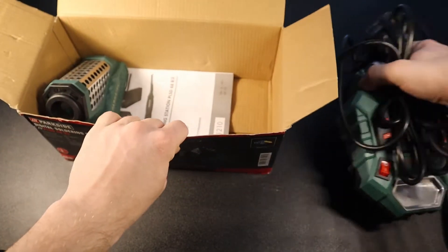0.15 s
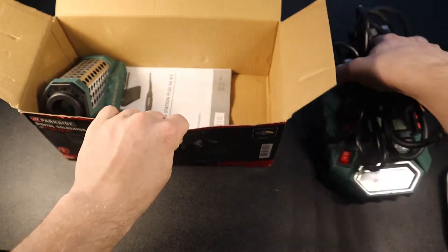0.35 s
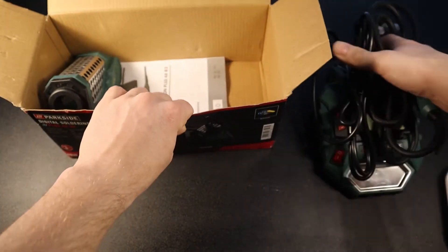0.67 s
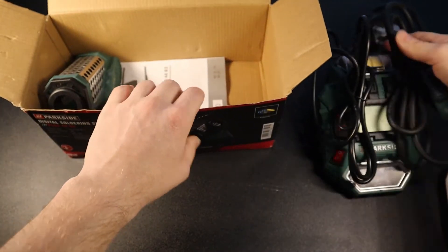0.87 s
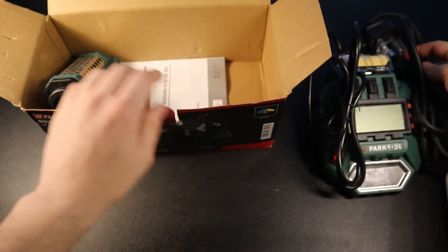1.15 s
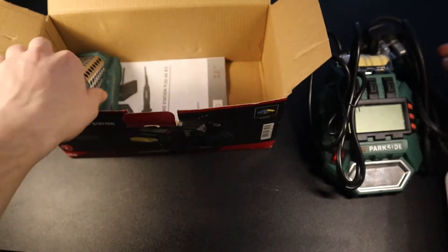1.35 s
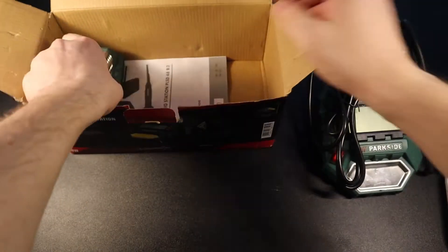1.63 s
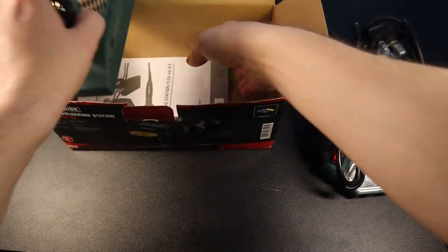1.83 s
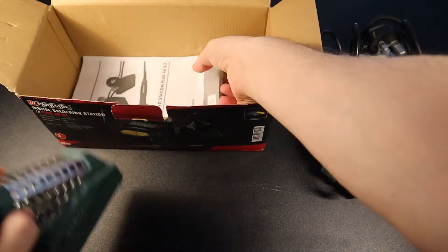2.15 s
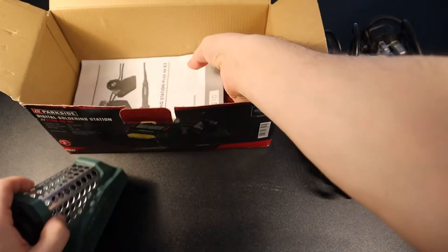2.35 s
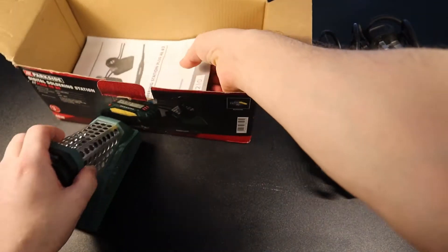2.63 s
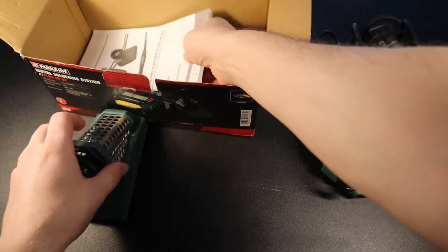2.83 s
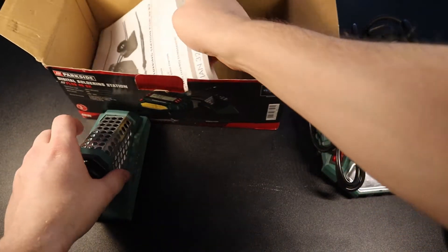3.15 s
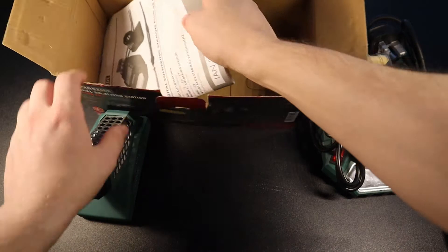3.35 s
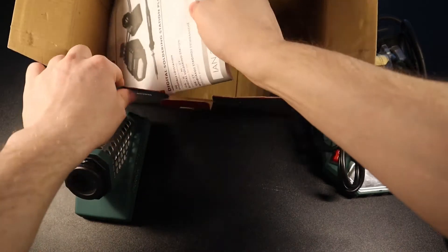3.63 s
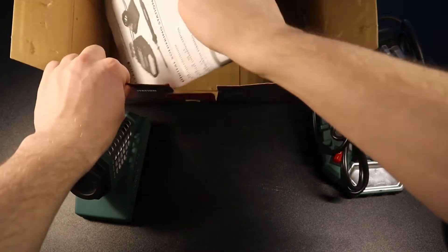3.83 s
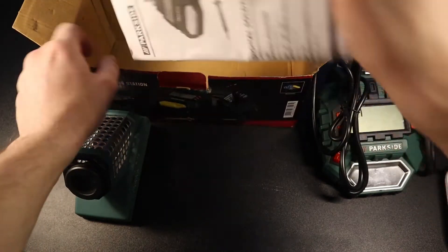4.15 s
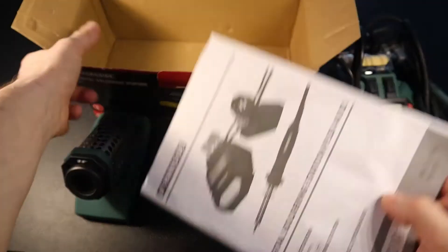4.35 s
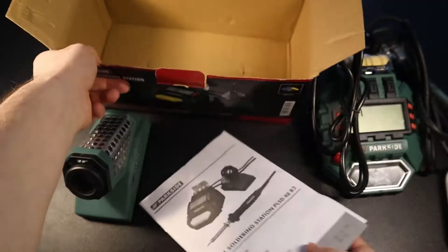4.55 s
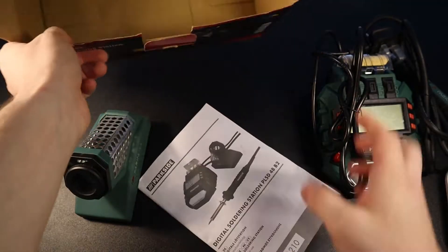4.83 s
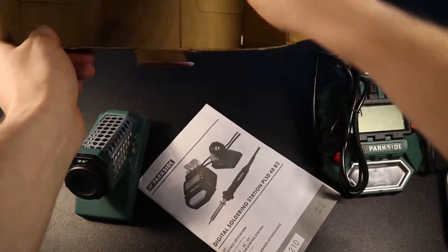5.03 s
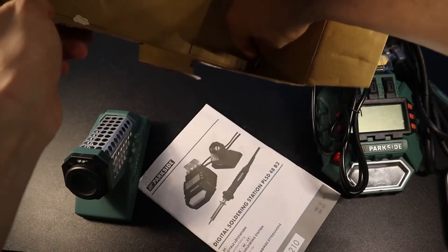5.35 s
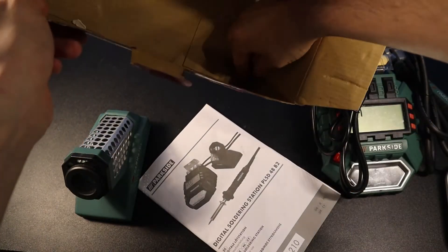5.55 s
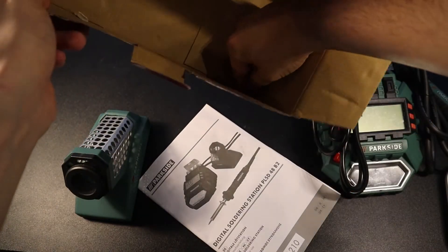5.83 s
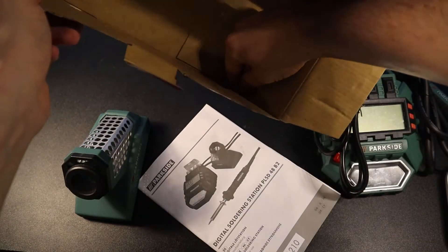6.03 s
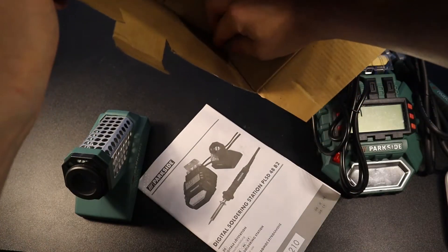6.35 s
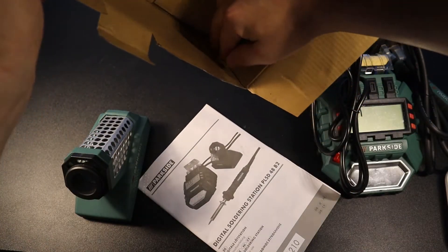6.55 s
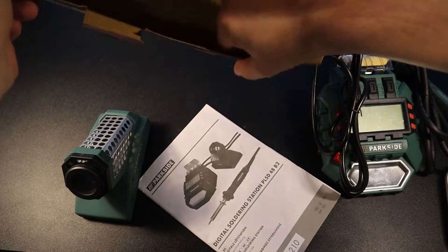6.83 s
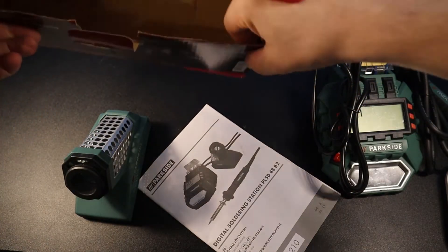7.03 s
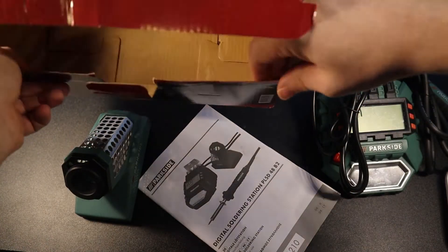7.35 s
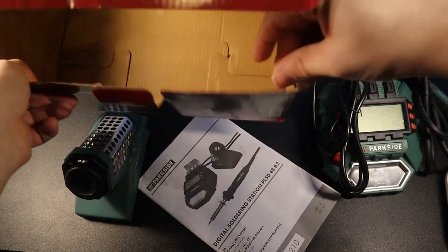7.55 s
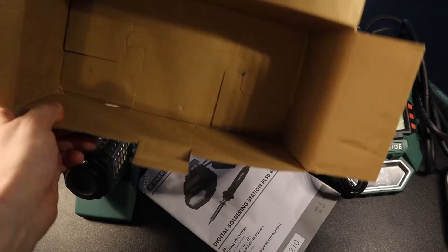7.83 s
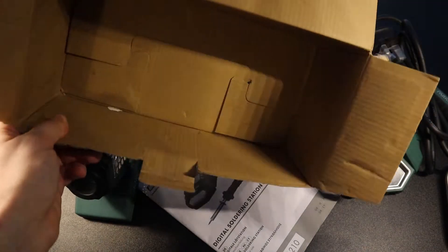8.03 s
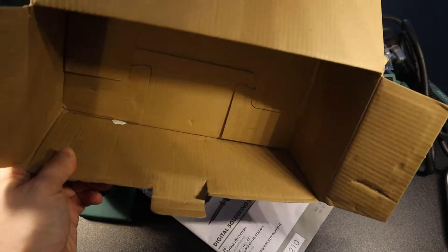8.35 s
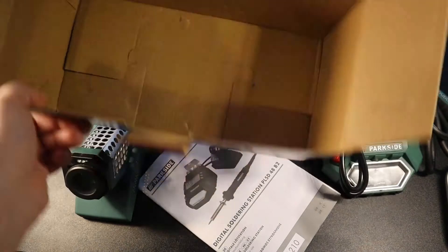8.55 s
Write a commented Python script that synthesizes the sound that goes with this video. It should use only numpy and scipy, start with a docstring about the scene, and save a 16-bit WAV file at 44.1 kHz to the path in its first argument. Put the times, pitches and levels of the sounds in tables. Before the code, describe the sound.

A close, dry handling scene in a small quiet room with very faint rumble and hiss. From 0 to 2 s, plastic knocks and clacks on a table, strongest at the start and near 0.7, 1.3 and 1.85 s, with brief cardboard scuffs and small snaps. Around 2.3 s light ticks lead into a firmer knock at 2.6 s; until about 4.2 s a paper booklet slides and rustles along the cardboard in short strokes, with faint low groans, ending in the loudest clack at 4.07 s. Quieter taps and paper flicks follow to 5.2 s. At 5.35 s a hollow box thump begins rubbing and scraping of the empty box, with snaps and tiny squeaks around 6.7 s. Softer, separate scuffs continue from 7 s. A dull bump lands at 7.8 s, a short rasp snaps at 7.92 s, then faint brushes fade to 8.7 s.

```python
"""Plastic knocks on a table, a booklet slides out of a cardboard box, then hands rub and bump the empty box,
and a flap snaps free with a short rasp, all close by in a small quiet room.
Knocks and bumps are fading rings started by a blow; rubbing is noise and tiny catches shaped like box or paper.
Small snaps are short noise bursts, groans are swelling narrow noise, and the rasp is a run of quickening slips."""
import sys
import numpy as np
from scipy import signal
from scipy.fft import rfft, irfft, next_fast_len
from scipy.io import wavfile
from scipy.ndimage import uniform_filter1d, map_coordinates

SR = 44100
rng = np.random.default_rng(int(sys.argv[2]) if len(sys.argv) > 2 else 0)


def digitize_waveform(pressure):
    """Quantize a signal to 16-bit integers and store it at the path in sys.argv[1].

    Rows of a 2-D input are taken as channels; values are limited to [-1, 1].
    """
    field = np.atleast_2d(pressure).T
    bounded = np.clip(field, -1, 1)
    quanta = np.round(bounded * 32767).astype(np.int16)
    wavfile.write(sys.argv[1], SR, quanta)


N = 382788  # length in samples

# how firmly the hands rub while the box is unloaded: t/s, handling level before trims/dB
UNLOADING = [(0, -53.5), (0.2, -80.5), (0.34, -78), (0.42, -67), (0.6, -61), (0.72, -70.5), (1.49, -73),
             (1.56, -55.5), (1.88, -64.5), (2.0, -73.5), (2.42, -64.5), (2.68, -60.5), (4.19, -59.5),
             (4.26, -74), (4.5, -74.5), (4.72, -61.5), (5.12, -90)]
# the same while the empty box is turned: t/s, handling level before trims/dB
TURNING = [(5.28, -89), (5.38, -56.5), (5.66, -61.5), (6.2, -69.5), (6.3, -56.5), (6.78, -60),
           (6.86, -75.5), (7.32, -69), (7.5, -87), (7.66, -70), (8.06, -74.5), (8.24, -85.5), (8.68, -91)]


def amp(db):
    """Turn decibels into a gain."""
    return 10 ** (np.asarray(db) / 20)


def unit(x):
    """Scale x to an average (rms) level of 1."""
    return x / np.sqrt(np.mean(x ** 2) + 1e-20)


def burst(x):
    """Scale x to rms 1 over its first 20 ms."""
    return x / np.sqrt(np.mean(x[:SR // 50] ** 2) + 1e-20)


def along(points, hz):
    """Read a curve of (f/Hz, value) points on a logarithmic frequency axis."""
    f, value = np.transpose(points)
    return np.interp(np.log(hz + 1), np.log(f + 1), value)


def curve(rows):
    """Join (t/s, value) points with straight lines, giving one value per sample."""
    times, values = np.transpose(rows)
    return np.interp(np.arange(N) / SR, times, values)


def wobble(rate):
    """A smooth random curve through this many random points a second."""
    points = rng.standard_normal(int(N * rate / SR) + 4)
    return map_coordinates(points, [np.arange(N) * rate / SR])


def filtered(x, response):
    """Multiply the spectrum of x by a function of frequency."""
    size = next_fast_len(N + 8192)
    hz = np.fft.rfftfreq(size, 1 / SR)
    return irfft(rfft(x, size) * response(hz), size)[:N]


def coloured(x, spectrum):
    """Shape x with a spectrum, at rms 1."""
    return unit(filtered(x, lambda hz: amp(along(spectrum, hz))))


def band(x, lo_hz, hi_hz, order=2):
    """Keep the sound between two frequencies."""
    edges = [lo_hz, min(hi_hz, SR / 2 - 1)]
    return signal.sosfilt(signal.butter(order, edges, 'band', fs=SR, output='sos'), x)


def add(track, s, x):
    """Mix x into the track at time s."""
    start = max(round(s * SR), 0)
    track[start:start + len(x)] += x[:N - start]


def in_room(x, wet_db):
    """Add a fresh random room tail in which each frequency dies away at its own speed."""
    # time for the tail to drop by 60 dB: f/Hz, t60/s
    room_decay = [(100, 0.15), (300, 0.23), (800, 0.14), (2500, 0.2), (12000, 0.14)]
    hz, t, z = signal.stft(rng.standard_normal(SR // 2), SR, nperseg=256)
    decay = amp(-60 * t / along(room_decay, hz)[:, None])
    tail = signal.istft(z * decay, SR, nperseg=256)[1]
    tail *= 1 - np.exp(-np.arange(len(tail)) / SR / 0.0073)  # the tail builds up over some 7 ms
    wet = signal.fftconvolve(x, tail / np.linalg.norm(tail))[:len(x)]
    return x + amp(wet_db) * wet


def struck(t, hz, t60):
    """One ringing tone that drops by 60 dB in t60 seconds."""
    return np.sin(2 * np.pi * hz * t) * amp(-60 * t / t60)


def crack(t, t60, scatter_db):
    """A single click and its dense, quickly dying scatter between nearby walls."""
    scatter = rng.standard_normal(len(t)) * amp(-60 * t / t60)
    return (t == 0) + amp(scatter_db) * scatter / np.linalg.norm(scatter)


def catches(rate, spread_db):
    """Fibres catch at random moments, on average rate a second, with uneven strength, at rms 1."""
    moments = rng.random(N) < rate / SR
    signs = rng.choice([-1, 1], N)
    strength = amp(spread_db * np.minimum(rng.standard_normal(N), 2))
    return unit(moments * signs * strength)


def room_air():
    """The room's faint rumble and hiss: steady noise shaped by a spectrum."""
    # strength of the background at each frequency: f/Hz, relative level/dB
    air_spectrum = [(12, -23), (20, 1), (27, -14.5), (53, -11), (172, -37), (308, -21.5), (397, -28),
                    (655, -34), (1650, -45), (2120, -40.5), (5470, -45), (8790, -50.5), (15800, -52)]
    return amp(-74) * coloured(rng.standard_normal(N), air_spectrum)


def hollow_ring(t, pitch_hz, modes):
    """The hollow box and table ring in many tones, stronger on average near the struck panel's pitch."""
    ring = np.zeros(len(t))
    for hz, level_db, t60 in modes:
        octaves_away = abs(np.log2(hz / pitch_hz))
        drive = rng.choice([-1, 1]) * amp(rng.normal(0, 3.8) - 2 * octaves_away)
        ring += drive * amp(level_db) * struck(t, hz, t60)
    return ring


def knocks():
    """Each blow bends one panel, rings the hollow body and clacks as hard as the contact is."""
    # blows on table and box; the levels are set before the trims below:
    # t/s, level/dB, panel pitch f/Hz, then the parts: thump/dB, clack/dB, tick/dB
    blows = [(0.0, -34.5, 645, -19, -6, -17), (0.089, -51, 390, -16, -6.5, -11.5),
             (0.367, -39, 420, 0, -9.5, -22), (0.539, -37.5, 506, -15, -5, -26),
             (0.739, -28.5, 727, -15.5, -7.5, -26.5), (0.775, -57.5, 590, 3, 9, -10),
             (0.86, -57, 520, -18, -17, -25), (0.95, -46, 300, -15, -12, -16.5),
             (1.116, -51, 423, -28, -7, -17), (1.303, -26.5, 620, -26, 2, -20.5),
             (1.357, -35, 686, -10, -6, -23.5), (1.484, -50, 607, -5, -19, -17),
             (1.5256, -40, 965, -11, -4, -8), (1.849, -31.5, 625, -17, -7, -20.5),
             (1.878, -41.5, 516, -12, -4, -14.5), (1.946, -51.5, 570, -25, -5.5, -5),
             (2.05, -49, 510, -12, -9.5, -11.5), (2.372, -51, 342, 1, -12, -26),
             (2.511, -36.5, 252, -10, -16, -19.5), (2.591, -30.5, 620, -15, -2, -18.5),
             (2.637, -48, 579, 1, -16, -14), (2.811, -46.5, 805, -10, -2.5, -6),
             (3.082, -45, 463, 8.5, -5, -0.5), (3.164, -42, 385, -24, -11, -19),
             (3.532, -37, 580, -28, -13.5, -42), (3.681, -42.5, 527, 0, -7, -22),
             (3.817, -43, 560, -32, -4.5, -29), (3.957, -44.5, 506, -2, 3, -10.5),
             (4.015, -43.5, 520, -22, 2.5, -6.5), (4.067, -22.5, 700, -20, -8, -31.5),
             (4.143, -29, 514, -15, -23, -30), (4.443, -60.5, 585, -3, -19, -18),
             (4.619, -49.5, 620, -2.5, -1, -7.5), (4.715, -50, 383, -10, -11, -9),
             (4.975, -49.5, 1020, -6.5, 0.5, -16.5), (5.339, -27, 614, -7, -7, -15.5),
             (5.431, -42.5, 791, -24, -2, -8), (5.477, -45.5, 667, -11, 2.5, -5),
             (5.54, -46, 614, -14, -4, -7.5), (5.673, -50, 590, -23, -4, -18),
             (5.928, -55, 615, -23, -8, -16), (6.256, -50.5, 340, 1.5, -22, -13),
             (6.309, -45.5, 400, -7.5, -13, -15), (7.711, -42.5, 610, -1.5, -12, -6),
             (7.822, -31.5, 336, -5.5, -23, -33.5), (7.987, -46, 305, -4, -1.5, -4.5),
             (8.113, -53, 570, -13, -9, -17.5)]
    # tones of the hollow box and table: f/Hz, level/dB, t60/s
    hollow_modes = [(70.9, -13.5, 0.099), (119, -5, 0.15), (165, 0, 0.095), (221.4, -4, 0.12),
                    (290, -0.5, 0.038), (352, -2, 0.086), (465.3, 4, 0.13), (580, 8, 0.086),
                    (672, 7.5, 0.046), (920.5, 5, 0.065), (1114, -1.5, 0.058), (1440, -10, 0.074),
                    (1572, -5, 0.045), (1957, -16.5, .06)]
    contact_s = 0.00029  # build-up time of a blow whose clack setting is 0 dB
    softening = 0.5  # dB longer build-up for each dB less clack
    out, t = np.zeros(N), np.arange(SR // 2) / SR
    for s, db, pitch_hz, thump_db, clack_db, tick_db in blows:
        ring = hollow_ring(t, pitch_hz, hollow_modes)
        thump = burst(band(ring, 43, 350, order=3))

        low_scatter = burst(band(crack(t, 0.069, 4.8), 430, 930))
        rattle = burst(burst(band(ring, 380, 1300)) + low_scatter)
        panel = burst(burst(struck(t, pitch_hz, 0.012)) + amp(-6) * rattle)

        high_scatter = burst(band(crack(t, 0.1, 3.3), 780, 3600))
        shell = burst(burst(band(ring, 1200, 2500)) + high_scatter)
        hard_contact = burst(burst(struck(t, 1300, 0.0045)) + amp(-3) * shell)
        # thick plastic and card radiate little above this band
        clack = burst(band(hard_contact, 750, 2300, order=3))
        tick = burst(band(crack(t, 0.04, 0), 1500, 4500, order=1))

        blow = amp(thump_db - 5.5) * thump
        blow += amp(-5.5) * band(panel, 220, 1400)
        blow += amp(clack_db - 8) * clack
        blow += amp(tick_db - 5) * band(tick, 1800, 17000)
        contact = contact_s * amp(-softening * clack_db)  # dull blows are soft ones
        blow *= 1 - np.exp(-t / max(contact, 1 / SR))  # a soft contact builds up slowly
        add(out, s + 0.0005, in_room(amp(db) * blow, wet_db=-10))  # starts 0.5 ms after the listed time
    return out


def stroke(t, length, swell_db):
    """Gain of one slide, t from its start: it sets in, arches over while swelling or fading, and stops."""
    attack_s, release_t60, arch_db = 0.014, 0.082, 3.5
    course = np.clip(t / length, 0, 1) - 0.5
    # a stroke is fastest, so loudest, in mid-course
    held = amp(swell_db * course - arch_db * (2 * course) ** 2)
    release = amp(-60 * np.maximum(t - length, 0) / release_t60)
    return np.clip(t / attack_s, 0, 1) * held * release


def sliding_levels(handling, steady_hiss_db):
    """Scraping and hiss in dB: the power of the steady rub plus that of the single strokes."""
    # single slides of paper, card and hands; levels before trims:
    # start t/s, length t/s, wall scraping level/dB, hiss level/dB, swell from start to end/dB
    slides = [(0.439, 0.12, -51, -93, 13.5), (0.911, 0.21, -68, -82, -11), (1.14, 0.088, -76, -78.5, 0),
              (1.702, 0.058, -52.5, -69, -8), (2.049, 0.062, -68, -70.5, -8), (2.451, 0.076, -60, -58, -6),
              (2.629, 0.065, -48.5, -60.5, -5), (2.741, 0.078, -58, -55.5, 4.5),
              (2.902, 0.136, -56.5, -59.5, -0.5), (3.034, 0.076, -48, -57.5, 4),
              (3.191, 0.135, -53.5, -57, 8.5), (3.383, 0.064, -55.5, -54.5, -4),
              (3.452, 0.033, -55.5, -76, -7), (3.594, 0.09, -55.5, -69.5, -8),
              (3.817, 0.087, -53.5, -59.5, 4), (3.946, 0.075, -51, -55.5, 3), (4.056, 0.098, -67, -61, -9),
              (4.695, 0.089, -81, -67.5, 9), (4.813, 0.078, -70, -71.5, -1), (5.496, 0.11, -51, -73, -9),
              (5.741, 0.037, -55, -72.5, -2), (5.91, 0.049, -54.5, -62, -2), (6.327, 0.069, -55, -58, 0),
              (6.45, 0.024, -56, -64, -5), (6.514, 0.054, -50.5, -67, -7), (6.616, 0.11, -54, -59.5, 2),
              (6.74, 0.11, -76, -68, 0), (6.88, 0.04, -53, -58.5, 3.5), (6.981, 0.058, -57.5, -67, 1),
              (7.054, 0.053, -58, -64, 2), (7.198, 0.059, -56, -68.5, -7), (7.359, 0.068, -62.5, -68.5, 3),
              (7.532, 0.038, -55, -64.5, -5), (7.687, 0.038, -46.5, -56.5, -3),
              (7.875, 0.062, -57.5, -66, -3), (7.993, 0.032, -66, -69, -5), (8.114, 0.064, -72, -79, -3),
              (8.272, 0.097, -78, -85, 1), (8.6, 0.081, -73.5, -77.5, 4.5)]
    steady = amp(curve(handling))
    scrape_power = steady ** 2
    hiss_power = (amp(steady_hiss_db) * steady) ** 2
    t = np.arange(SR // 2) / SR
    for s, length, wall_db, surface_db, swell_db in slides:
        gain = stroke(t, length, swell_db)
        add(scrape_power, s, (amp(wall_db) * gain) ** 2)
        add(hiss_power, s, (amp(surface_db) * gain) ** 2)
    return 10 * np.log10(scrape_power), 10 * np.log10(hiss_power)


def patchy(x, depth_db, size):
    """The contact point wanders, so that resonances come and go."""
    z = signal.stft(x, nperseg=512)[2]
    across_pitch = uniform_filter1d(rng.standard_normal(z.shape), size, 0)
    field = uniform_filter1d(across_pitch, 7, 1)  # smoothed over time as well
    return unit(signal.istft(z * amp(depth_db * unit(field)), nperseg=512)[1][:N])


def rubbing(handling, steady_hiss_db, scrape_spectrum, hiss_spectrum):
    """Sliding fibres hiss; their catches shake the box walls, which also flex under the pressure."""
    # slow flexing of the walls: f/Hz, relative level/dB
    flex_spectrum = [(25, -12), (60, 0), (130, -4.5), (220, -4), (350, -10), (700, -35.5)]
    scrape_db, hiss_db = sliding_levels(handling, steady_hiss_db)
    grip_db = 1.2 * wobble(70)  # the contact sticks and lets go

    ridges = catches(rate=460, spread_db=3)
    shaking = patchy(ridges + amp(-6) * rng.standard_normal(N), depth_db=4, size=2)
    body = amp(scrape_db - 2.07 + grip_db) * coloured(shaking, scrape_spectrum)

    fibres = catches(rate=7400, spread_db=-0.5)
    fibres += amp(-3) * rng.standard_normal(N) + amp(-12) * ridges
    crackle = 0.5 * catches(rate=110, spread_db=5)  # single fibres break free
    rustle = patchy(fibres, depth_db=5, size=3) + crackle
    surface = amp(hiss_db - 1.8 + grip_db) * coloured(rustle, hiss_spectrum)

    # the flexing grows less than the scraping does
    flex_db = 0.46 * scrape_db - 43 + wobble(12)
    flex = amp(flex_db) * coloured(rng.standard_normal(N), flex_spectrum)

    t = np.arange(N) / SR
    during = (t >= handling[0][0]) * (t < handling[-1][0])
    return in_room((body + surface + flex) * during, wet_db=-10)


def unloading():
    """Rubbing of the loaded box and its booklet, with the spectra of card and paper."""
    # scraping of the loaded box: f/Hz, relative level/dB
    scrape_spectrum = [(120, -29.5), (230, -3), (400, -1), (750, -1.5), (930, -2.5), (1200, -9),
                       (1700, -13), (2400, -24.5), (3500, -20), (7000, -62.5)]
    # hiss of sliding paper: f/Hz, relative level/dB
    hiss_spectrum = [(900, -18.5), (1900, 7.5), (3200, 4.5), (4200, 2), (4900, -2.5), (6300, 3), (9000, -1),
                     (11000, 1), (13000, -8.5), (15800, -10.5)]
    return rubbing(UNLOADING, -13.5, scrape_spectrum, hiss_spectrum)


def crinkles():
    """Creases and small parts tick at random, louder when the handling is firmer."""
    pitch_hz, ticks_per_s, level_db = 3600, 16, -19  # level relative to the handling
    t = np.arange(SR // 8) / SR
    flick = band(crack(t, 0.054, -1.8), pitch_hz * 0.36, pitch_hz * 1.3, order=1)
    handling_db = curve(UNLOADING + TURNING)
    ticks = catches(rate=ticks_per_s, spread_db=5) * amp(handling_db + level_db)
    return signal.fftconvolve(ticks, flick / np.linalg.norm(flick))[:N]


def buckles():
    """A box wall gives way softly under the hands with a dull, low bump."""
    # bumps of the walls: t/s, level/dB, pitch f/Hz
    bumps = [(0.37, -53, 125), (0.425, -57, 117), (0.556, -51.5, 130), (2.435, -56, 165),
             (2.745, -59.5, 156), (3.085, -52, 115), (4.187, -63.5, 128), (4.592, -62.5, 330),
             (5.341, -42.5, 264), (5.343, -47.5, 80.5), (5.585, -62, 111), (6.31, -55, 127),
             (6.473, -64, 73), (7.826, -40.5, 290)]
    out, t = np.zeros(N), np.arange(SR // 3) / SR
    for s, db, pitch_hz in bumps:
        swing = struck(t, pitch_hz, 11 / pitch_hz)  # it dies within a few cycles
        swing *= 1 - np.exp(-t / 0.004)  # soft start
        add(out, s, in_room(amp(db) * burst(swing), wet_db=-11.5))
    return out


def snaps():
    """Paper edges, creases and thin plastic parts flick over with a very short ring."""
    # small dry snaps: t/s, level before the trim below/dB, pitch f/Hz
    flicks = [(0.8848, -64, 3230), (1.353, -50, 2740), (1.5262, -38, 3050), (1.5777, -57, 3040),
              (1.625, -55, 2870), (2.2652, -49, 7160), (2.3027, -52, 6900), (2.3531, -53, 6400),
              (2.4526, -56, 6150), (3.6178, -50, 3400), (4.3, -55, 6460), (4.595, -52, 3140),
              (4.6441, -47.5, 2800), (4.777, -44.5, 6620), (4.9385, -47.5, 3000), (4.970, -48, 2950),
              (5.2408, -59.5, 3900), (5.3815, -43, 3320), (5.461, -43, 3250), (5.7234, -56, 3320),
              (6.537, -42, 3760), (7.861, -60, 3270), (8.05, -59, 9240), (8.6228, -58, 2950)]
    out, t = np.zeros(N), np.arange(SR // 4) / SR
    for s, db, pitch_hz in flicks:
        flick = burst(band(crack(t, 0.055, 2.2), pitch_hz * 0.55, pitch_hz * 1.7))
        spit = burst(band(crack(t, 0.025, -4), 2500, 15000))
        ping = burst(struck(t, pitch_hz, 0.009))
        snap = flick + amp(-1.5) * ping + amp(-11) * spit
        add(out, s, in_room(amp(db - 19.5) * snap, wet_db=-11))
    return out


def groans():
    """Firm strokes stick and slip, so a surface judders at its own pitch: narrow noise that swells and fades."""
    # groans and squeaks: middle t/s, length t/s, level before the trim below/dB, pitch f/Hz
    squeaks = [(1.241, 0.007, -70.5, 2000), (2.661, 0.034, -59, 290), (3.294, 0.095, -65, 1100),
               (3.44, 0.085, -66, 1090), (5.774, 0.0084, -59.5, 602), (6.675, 0.033, -59, 740),
               (6.701, 0.0093, -54.5, 810), (6.762, 0.0063, -50, 670), (6.795, 0.011, -56.5, 694),
               (6.899, 0.014, -63.5, 717)]
    out, t = np.zeros(N), np.arange(SR // 2) / SR - 1 / 4  # t is 0 at the middle
    for s, length, db, pitch_hz in squeaks:
        wall = band(rng.standard_normal(len(t)), pitch_hz * 0.89, pitch_hz * 1.11)
        swell = np.exp(-2 * (t / length) ** 2)
        judder = unit(wall * swell) * np.sqrt(np.mean(swell ** 2))
        add(out, s - 1 / 4, in_room(amp(db + 6.5) * judder, wet_db=-9.5))
    return out


def turning():
    """Rubbing of the empty box in bare hands, with the spectra of card and skin."""
    # scraping of the empty box: f/Hz, relative level/dB
    scrape_spectrum = [(150, -39), (260, -11.5), (380, 0), (520, -3), (720, -0.5), (1100, -8), (1600, -13),
                       (2300, -21), (3500, -27), (7000, -60)]
    # hiss of sliding skin: f/Hz, relative level/dB
    hiss_spectrum = [(900, -23), (1900, -1), (2800, -2), (4200, 3), (5500, -4.5), (8000, -2), (10000, -4),
                     (12500, -4.5), (15800, -12.5)]
    return rubbing(TURNING, -11, scrape_spectrum, hiss_spectrum)


def rasp():
    """A flap's cut edge jerks past the card in quickening slips; the box wall echoes each one."""
    # jerks as the edge slips free, each loudest at its start: t/s, level before the trim below/dB
    jerks = [(7.922, -31.5), (7.94, -34.5)]
    # sound of the cut edge: f/Hz, relative level/dB
    edge_spectrum = [(290, -47), (500, -33), (805, -9.5), (1060, -16.5), (1260, -6.5), (1460, -19.5),
                     (2060, -8), (2250, -11.5), (3470, -7.5), (3890, -10.5), (5580, 0.5), (7780, -3.5),
                     (15800, -22)]
    fade_db_per_s = 560.5
    length_s, release_t60 = 0.04, 0.015  # until the edge is free; the dying away after that
    slips_per_s, doubling_s = 280, 0.05  # starting rate, before its random wobble; time for it to double

    clock = np.arange(N) / SR
    t = clock - jerks[0][0]
    force = np.max([(clock >= s) * amp(db - fade_db_per_s * abs(clock - s)) for s, db in jerks], axis=0)
    release = amp(-60 * np.maximum(t - length_s, 0) / release_t60)

    rate = slips_per_s * 2 ** (np.clip(t, 0, length_s) / doubling_s)
    travel = np.cumsum(rate * amp(4 * wobble(400))) / SR
    passed = np.floor(travel - travel[np.argmax(t > 0)])  # the first slip starts the rasp
    slips = np.diff(passed, prepend=passed[0]) / np.sqrt(rate)

    # every slip sets off noise that fades over a few ms
    slip_fade = signal.lfilter([1], [1, -np.exp(-1 / (0.0037 * SR))], slips)
    chatter = slip_fade * rng.standard_normal(N)
    edge = amp(-3) * force * release * coloured(chatter, edge_spectrum)
    echoed = filtered(edge, lambda hz: 1 + 0.28 * np.exp(-2j * np.pi * hz * 0.0033))  # echo 3.3 ms later
    return in_room(echoed, wet_db=-25)


def scene():
    """Handling sounds over the room's faint rumble and hiss."""
    hits = knocks() + buckles() + snaps()
    slides = unloading() + turning() + groans() + rasp()
    return room_air() + hits + slides + crinkles()


def record(dry):
    """One channel, with nothing above 15.9 kHz."""
    return filtered(dry, lambda hz: hz < 15900)[None]


dry = scene()
out = record(dry)
digitize_waveform(out)
```